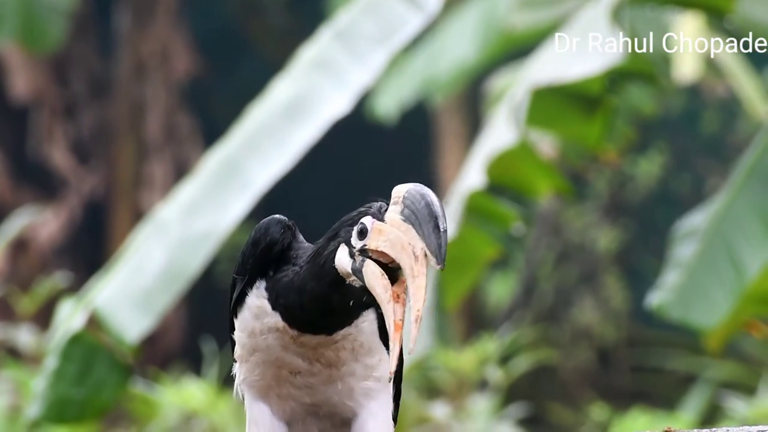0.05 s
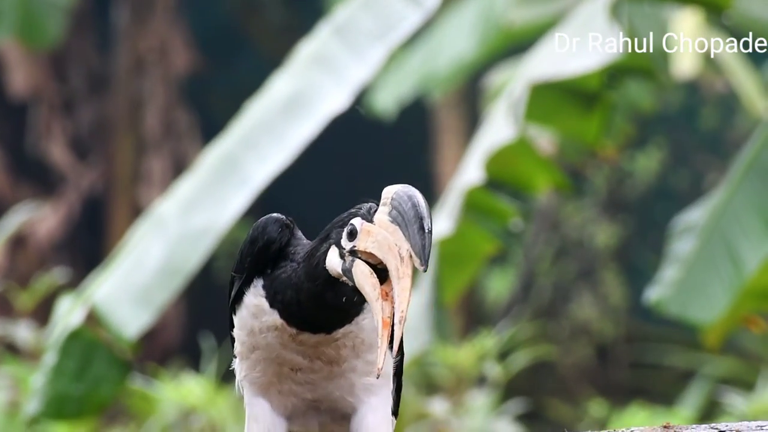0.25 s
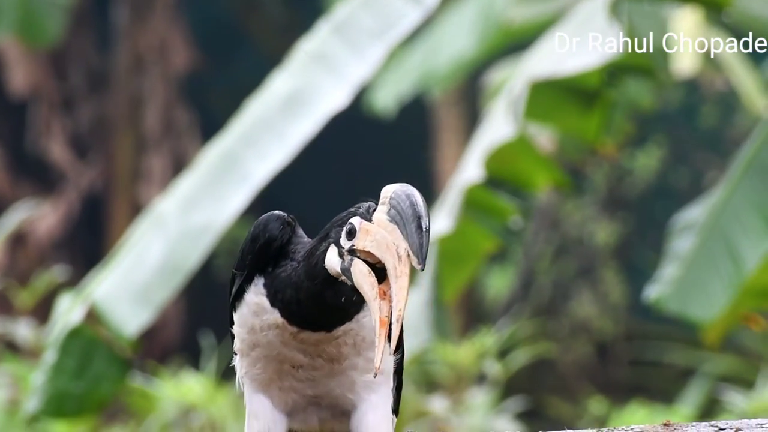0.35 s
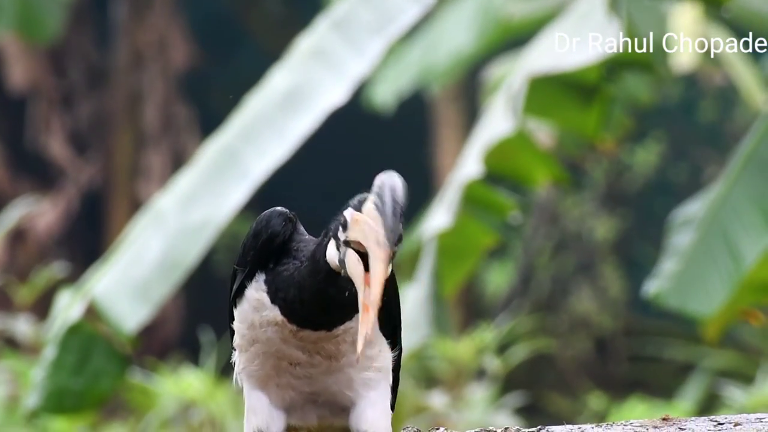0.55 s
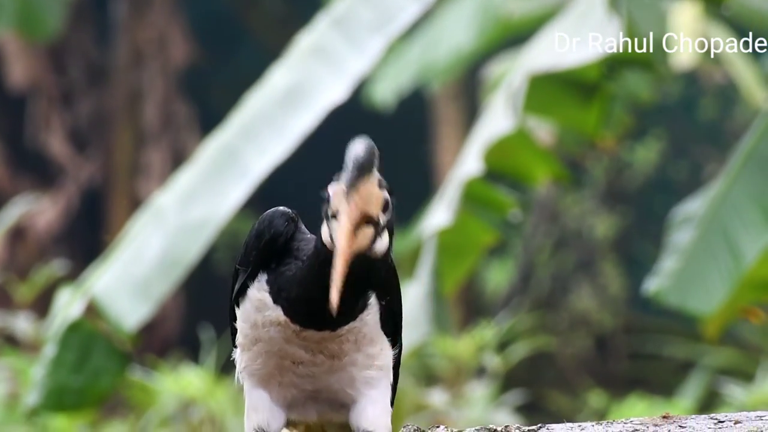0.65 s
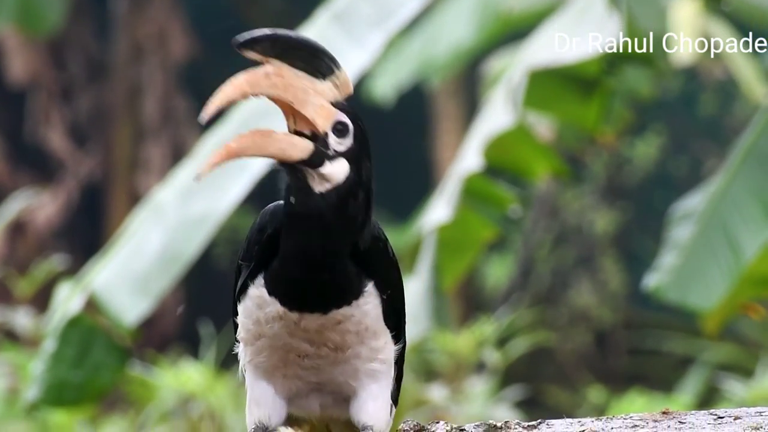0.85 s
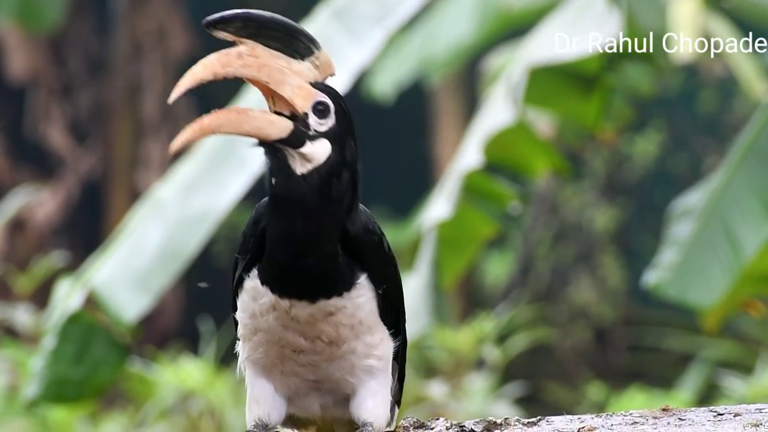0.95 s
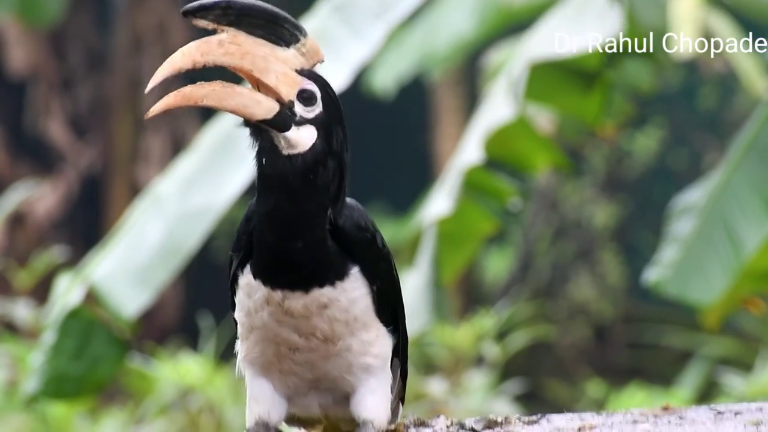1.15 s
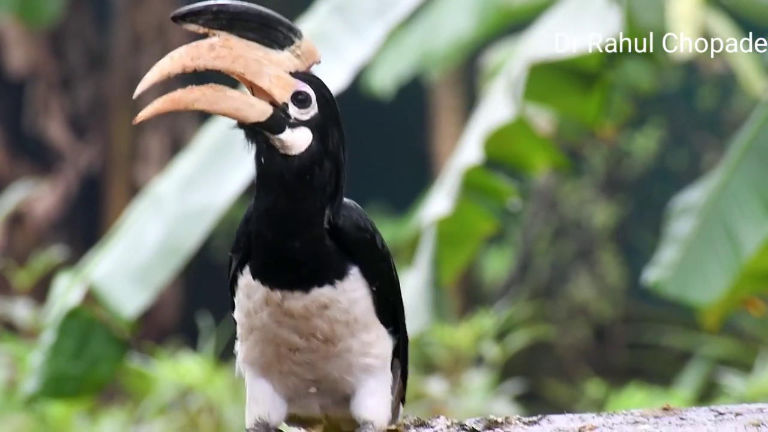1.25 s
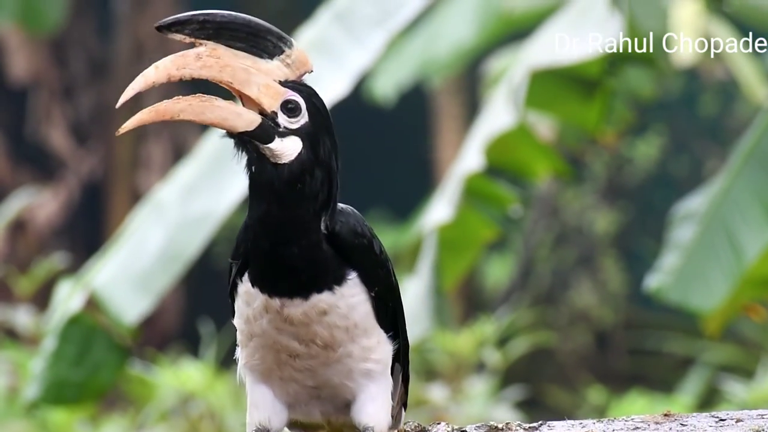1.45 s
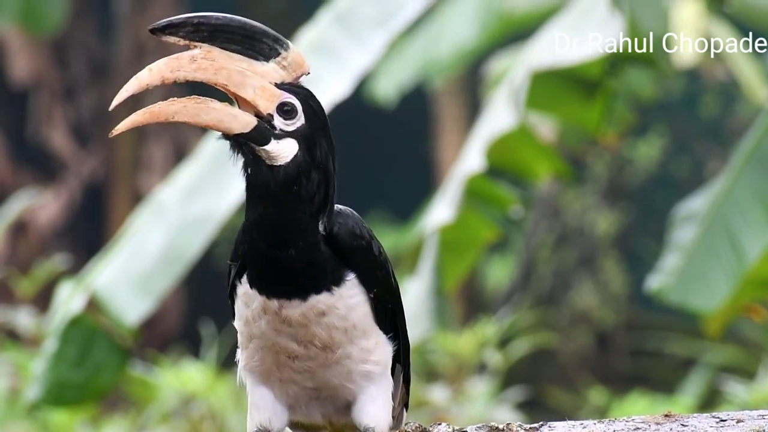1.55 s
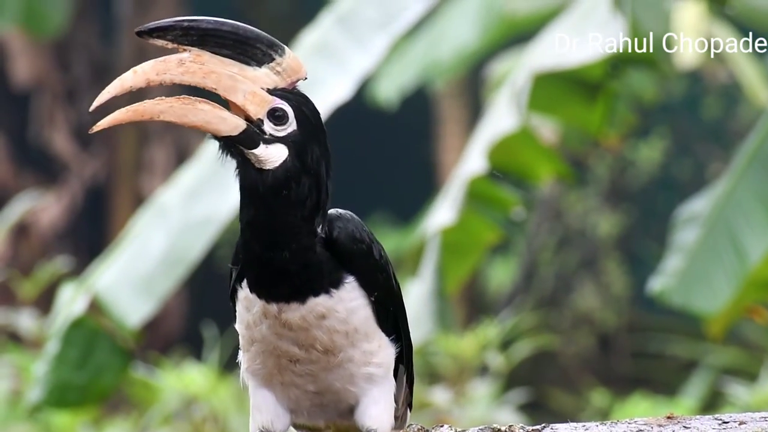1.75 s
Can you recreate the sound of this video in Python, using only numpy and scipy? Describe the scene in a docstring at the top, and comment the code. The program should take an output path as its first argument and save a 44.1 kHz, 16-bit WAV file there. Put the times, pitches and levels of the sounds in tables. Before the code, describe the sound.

A hornbill gives three loud, harsh nasal honks close by, each starting and ending in a rasp. Thin whines fill the pauses, and a weaker call begins last. Trees echo faintly over a low outdoor rumble.

```python
"""A hornbill in a garden

A hornbill honks harshly from a perch close by, its voice box sending pulses of air through throat and
bill. The first two loud calls break from a rasp and a high squawk into a nasal honk, the third from a
rasp and a soft croak; each falls apart in a rasp again. Thin whines fill the pauses. Leaves scatter
the sound, and the trees give back a long faint echo over a low outdoor rumble."""
import sys
import numpy as np
from scipy import signal
from scipy.fft import rfft, irfft, next_fast_len
from scipy.io import wavfile
from scipy.ndimage import uniform_filter1d, minimum_filter1d

SR = 44100
rng = np.random.default_rng(int(sys.argv[2]) if len(sys.argv) > 2 else 0)


def log_audio(samples):
    """Write samples as a 16-bit WAV file to the path given in sys.argv[1]."""
    # one column per channel
    frames = np.atleast_2d(samples).T
    # limit to full scale, then quantise
    limited = np.clip(frames, -1, 1)
    pcm = np.round(limited * 32767).astype(np.int16)
    wavfile.write(sys.argv[1], SR, pcm)


N = 79380  # 1.8 seconds
TOP_HZ = 15400  # upper edge of the sound


def amp(db):
    """Turns decibels into a number to multiply by."""
    return 10 ** (np.asarray(db) / 20)


def unit(x):
    """Scales a sound to an average power of 1."""
    return x / np.sqrt(np.mean(x ** 2) + 1e-20)


def steady(x, size=220):
    """Holds the level at 1, averaging over `size` samples."""
    return x / np.sqrt(abs(uniform_filter1d(x ** 2, size)) + 1e-12)


def look_up(points, hz):
    """Reads between the rows of a (frequency, value) table, with octaves evenly spaced."""
    row_hz, value = np.transpose(points)
    return np.interp(np.log(hz + 1), np.log(row_hz + 1), value)


def hiss(n):
    """White noise for one note."""
    return rng.standard_normal(SR // 2)[:n]


def wander(n, hz):
    """A smooth random wobble of size about 1, mostly slower than `hz`."""
    size = SR // 2
    rolloff = np.sqrt(1 + (np.fft.rfftfreq(size, 1 / SR) / hz) ** 4)
    return unit(irfft(rfft(hiss(size)) / rolloff, size))[:n]


def resonate(x, throat, size=2048):
    """Filters a sound as throat and bill do: they ring after each pulse, never before it."""
    log_gain = np.log(amp(look_up(throat, abs(np.fft.fftfreq(size, 1 / SR)))))
    ring = np.fft.ifft(np.exp(np.conj(signal.hilbert(log_gain)))).real
    return signal.fftconvolve(x, ring[:size // 2])[:len(x)]


def note_curves(table):
    """A note's start time, its 2 ms fade in and out, and a curve for each column after time."""
    times, *columns = np.transpose(table)
    times = np.sort(times)
    t = np.arange(times[0], times[-1], 1 / SR)
    fade = np.clip(np.minimum(t - times[0], times[-1] - t) / .002, 0, 1)
    return times[0], fade, [np.interp(t, times, column) for column in columns]


def pulses(cycles, hz, tilt_db, lows_db=(0, 0), count=14):
    """One pulse per cycle, built from harmonics: tones at whole multiples of the pitch."""
    k = np.arange(1, count + 1)[:, None]
    db = tilt_db * np.log2(k) + np.pad(lows_db, (0, count - 2))[:, None]
    return np.sum(amp(db) * (k * hz < TOP_HZ) * np.cos(2 * np.pi * k * cycles), axis=0)


# Tone of the outdoor background (frequency [Hz], relative level [dB])
AIR_TONE = [(20, -5), (31, 3), (45, 2.5), (70, -2.5), (130, 2), (200, -5), (300, -13), (500, -20.5),
            (900, -22), (2000, -18), (5000, -16.5), (9000, -21), (10500, -33), (15000, -46)]
# How alike it is in the two ears (frequency [Hz], likeness [0-1])
AIR_LIKENESS = [(120, .999), (250, 1), (600, 1), (2000, 0.21), (8000, 0.1)]


def outdoor_air(level_db=-40.5):
    """A distant low rumble, alike in both ears, and a faint wide hiss."""
    hz = np.fft.rfftfreq(N, 1 / SR)
    left, other = rfft(rng.standard_normal((2, N)))
    likeness = look_up(AIR_LIKENESS, hz)
    right = likeness * left + np.sqrt(1 - likeness ** 2) * other
    return amp(level_db) * unit(irfft(np.array([left, right]) * amp(look_up(AIR_TONE, hz)), N))


# How long the trees echo (frequency [Hz], time to fade by 60 dB [s]); a negative time grows instead
TREE_FADE = [(500, 1), (1500, 0.26), (4000, 0.4), (6500, 0.4), (10000, 1.2), (15000, -1.5)]
# How strong their echo is next to the direct call (frequency [Hz], level [dB])
TREE_LEVEL = [(500, -35), (1250, -15), (1800, -16.5), (2500, -15.5), (3100, -24), (3800, -17),
              (5100, -17.5), (6400, -16.5), (10000, -24.5), (15000, -26)]


def tree_echo(swell_s=.13, row_delay_s=.26, row_spread_s=.038, row_db=6):
    """The trees' answer to a click: it swells slowly, and a row of trees adds a smeared bump."""
    hz, t, noise = signal.stft(rng.standard_normal(N), SR, nperseg=256)
    shape = amp(-60 * t / look_up(TREE_FADE, hz)[:, None])
    shape *= 1 - np.exp(-t / swell_s)
    shape *= amp(row_db * np.exp(-.5 * ((t - row_delay_s) / row_spread_s) ** 2))
    band_energy = N * np.mean(shape ** 2, axis=1, keepdims=True)
    shape *= amp(look_up(TREE_LEVEL, hz))[:, None] / np.sqrt(band_energy)
    return signal.istft(noise * shape, SR, nperseg=256)[1][:N]


def leaf_scatter(level_db=-9.5, fade_s=.051):
    """Nearby leaves scatter a click into a quickly dying puff of noise."""
    t = np.arange(N) / SR
    return amp(level_db) * unit(rng.standard_normal(N) * amp(-60 * t / fade_s)) / np.sqrt(N)


# Bounces off nearby surfaces into each microphone (delay [ms], gain [factor])
LEFT_BOUNCES = [(1.3, 0.022), (3.1, 0.061), (7.4, -0.18), (13.2, 0.093)]
RIGHT_BOUNCES = [(.9, -0.01), (2.3, 0.17), (5.9, 0.18), (11.1, -0.14)]
# The bill points across the microphones (frequency [Hz], left minus right level [dB])
SIDE_BALANCE = [(60, 2), (87, 4), (120, 3), (180, 0.0), (260, -7), (380, 1), (540, 0.0), (780, 2.5),
                (1130, -1.5), (1630, -1), (2350, -2.0), (3390, 0.5), (4890, 0.0), (7060, -0.5),
                (10200, -7.5), (14700, 5)]
# How far the left wave runs ahead of the right (frequency [Hz], phase [radians])
LEFT_LEAD = [(0, 0.32), (1030, -0.046), (1640, 0.83), (1980, -0.022), (2580, 0.22), (3700, -0.32),
             (3960, -0.69), (4820, -0.5), (6460, -0.56), (6800, -1.7), (7920, 0.06), (8350, -1.5),
             (9390, -1.35), (10200, -1.5), (12800, 0.14), (14900, -0.0)]


def garden(voice, bounces, side):
    """The call and all its echoes at one microphone; side is 1 for left, -1 for right."""
    paths = tree_echo() + leaf_scatter()
    paths[0] += 1  # the direct call
    for delay_ms, gain in bounces:
        paths[round(delay_ms * SR / 1000)] += gain
    size = next_fast_len(len(voice) + N)
    hz = np.fft.rfftfreq(size, 1 / SR)
    balance = amp(side * look_up(SIDE_BALANCE, hz) / 2)
    phase_shift = np.exp(.5j * side * look_up(LEFT_LEAD, hz))
    heard = irfft(rfft(voice, size) * rfft(paths, size) * balance * phase_shift, size)
    return heard[len(voice) - N:len(voice)]  # keep the part from time zero on


# One list of points per whine (time [s], pitch [Hz], level [dB])
WHINE_NOTES = [
    [(0, 744, -43), (.05, 781.4, -32), (.12, 756, -37.5), (.17, 750, -45), (.205, 681, -40)],
    [(.52, 700, -57), (.57, 770, -31.5), (.61, 804, -29.5), (.665, 792, -26.5), (.688, 750, -76)],
    [(.945, 742, -43), (.975, 812, -32.5), (1.005, 834.6, -32.5), (1.1, 808.5, -29.5), (1.21, 794.3, -32),
     (1.24, 772, -35), (1.262, 735, -51)],
    [(1.485, 730, -56), (1.53, 742, -39), (1.565, 730, -47.5), (1.605, 688, -57)],
]
# One value per whine (gain of all harmonics but the second [dB])
WHINE_HARMONICS = [-3.5, -1.5, 0, -5]
# How throat and bill shape a whine (frequency [Hz], relative gain [dB])
WHINE_TONE = [(400, -32), (800, -21), (1550, -0.5), (2400, -16), (3250, -11.5), (4000, -12), (4800, -18),
              (5700, -18), (7200, -30), (10000, -42), (15000, -40)]


def whines(pitch_wobble=.004, breath=.29):
    """Thin, nearly pure notes: the throat favours their second harmonic."""
    for table, others_db in zip(WHINE_NOTES, WHINE_HARMONICS):
        start, fade, (hz, db) = note_curves(table)
        n = len(hz)
        cycles = np.cumsum(hz * (1 + pitch_wobble * wander(n, hz=120))) / SR
        second = np.cos(2 * np.pi * 2 * cycles)
        others = pulses(cycles, hz, 0) - second
        source = second + amp(others_db) * others + breath * hiss(n)
        yield start, fade * amp(db) * steady(resonate(source, WHINE_TONE))


# One row per rasp (peak time [s], level [dB], time to rise 20 dB [s], time to fall 20 dB [s],
# typical flap rate [Hz], gain of the low knock [dB])
RASP_BURSTS = [(0.191, -33.5, .04, 0.022, 900, -5), (.238, -13, .024, 0.028, 780, 1),
               (.425, -19, 0.019, 0.053, 720, -24), (.535, -27, 0.048, 0.045, 930, -20),
               (.64, -26.5, 0.068, .1, 910, -8), (.706, -11.5, 0.022, 0.028, 840, 2.5),
               (.884, -19, 0.018, 0.041, 680, -22), (1.283, -28.5, .01, 0.08, 427, 3.5),
               (1.303, -17.5, 0.014, 0.011, 450, -15), (1.407, -21.5, 0.013, 0.034, 576, -12),
               (1.772, -33, 0.012, 0.069, 800, -32)]
# How throat and bill shape a rasp (frequency [Hz], relative gain [dB])
RASP_TONE = [(200, -18), (500, -18.5), (800, -26.5), (1050, -22), (1300, -2.5), (1700, 4.5), (2200, -2.5),
             (2900, -2.5), (3600, 0), (4600, -2), (6200, -11), (8800, -15), (10500, -32.5), (15000, -35.5)]


def rasps(breath=.47, knock_below_hz=886):
    """The voice box flaps unevenly as a call starts or breaks up."""
    t = np.arange(-SR // 10, SR // 5) / SR  # zero at the peak
    n = len(t)
    highpass = signal.butter(4, knock_below_hz, "high", fs=SR, output="sos")
    lowpass = signal.butter(4, knock_below_hz, fs=SR, output="sos")
    for peak_s, db, rise_s, fall_s, flap_hz, knock_db in RASP_BURSTS:
        cycles = np.cumsum(flap_hz * np.exp(.4 * wander(n, hz=397.6))) / SR
        flaps = np.diff(np.floor(cycles), prepend=0)  # one click per cycle
        flaps *= amp(3.2 * wander(n, hz=504))
        puffs = np.exp(-2 * (cycles % 1)) * hiss(n)
        source = unit(flaps) + breath * unit(puffs)
        source = signal.sosfilt(highpass, source) + amp(knock_db) * signal.sosfilt(lowpass, source)
        loudness = amp(db - 20 * np.maximum(-t / rise_s, t / fall_s))
        yield peak_s + t[0], loudness * steady(resonate(source, RASP_TONE), size=500)


def voiced_note(table, throat, lows_db=(0, 0)):
    """Voice box pulses slip in time and strength when rough; pairing up adds a tone an octave down."""
    pitch_wobble, level_wobble, breath = .022, .48, .11  # at full roughness
    rough_slip_cycles, pair_slip_cycles = .047, .071
    start, fade, (hz, db, rough, pairing, brightness) = note_curves(table)
    n = len(hz)
    cycles = np.cumsum(hz * (1 + pitch_wobble * rough * wander(n, hz=231))) / SR
    cycles += pair_slip_cycles * pairing * np.cos(np.pi * cycles)  # one pulse early, the next late
    cycles += rough_slip_cycles * rough * wander(n, hz=640)
    buzz = steady(pulses(cycles, hz, brightness, lows_db))
    buzz *= 1 + level_wobble * rough * wander(n, hz=475)
    puffs = (1 + np.cos(2 * np.pi * cycles)) * hiss(n)
    return start, fade * amp(db) * steady(resonate(buzz + breath * rough * puffs, throat))


# One list of points per croak
# (time [s], pitch [Hz], level [dB], roughness [0-1], pulse pairing [0-1], brightness [dB per octave])
CROAK_NOTES = [
    [(1.277, 869, -39, .3, .1, -5), (1.292, 898, -35.5, 0.34, .1, -2), (1.304, 933, -28, 0.33, .1, -6)],
    [(1.408, 997, -32, .3, .1, 3), (1.428, 890, -37, 0.19, .1, -2), (1.455, 857, -44, .2, .1, -3)],
]
# How throat and bill shape a croak (frequency [Hz], relative gain [dB])
CROAK_TONE = [(400, -25), (900, -7.5), (1700, -4), (2600, 6), (3600, 6), (5500, 0), (9000, -22),
              (15000, -54)]


def croaks():
    """Slower, softer pulses just before and after the honk at 1.3 s."""
    return [voiced_note(table, CROAK_TONE) for table in CROAK_NOTES]


# One list of points per squawk
# (time [s], pitch [Hz], level [dB], roughness [0-1], pulse pairing [0-1], brightness [dB per octave])
SQUAWK_NOTES = [
    [(.221, 1578, -22.5, 0.77, 0.18, 0), (.232, 1718, -12.5, 0.91, .2, -3.5),
     (.238, 1748, -11.5, 0.68, 0.22, -1.5), (.243, 1700, -24, 0.53, .2, -8)],
    [(.25, 1756, -22, 0.51, .1, 0), (.255, 1763, -11.5, 0.32, .1, -0.75),
     (.268, 1878, -10, 0.13, 0.093, 0.5), (.276, 1954, -13, 0.15, .1, -0.69),
     (.286, 1970, -23, 0.41, .2, -2)],
    [(.695, 1523, -16.5, 1, 0.16, -0.5), (.704, 1673, -12, 0.94, 0.22, 4.5),
     (.714, 1827, -10, 0.58, 0.6, 1), (.721, 1950, -7.5, 0.8, 0.23, 9)],
    [(1.787, 1800, -35, .4, 0.11, -7), (1.793, 1770, -25, 0.35, .1, -16), (1.8, 1810, -21, 0.34, .1, 0)],
]
# How throat and bill shape a squawk (frequency [Hz], relative gain [dB])
SQUAWK_TONE = [(300, -47), (900, -40), (1400, -7), (1850, 0.5), (2500, -11), (3700, -3.5), (5500, -6.5),
               (7500, -15.5), (9200, -19), (11000, -25.5), (15000, -88)]


def squawks():
    """The voice box pulses in its fast, high range for a moment."""
    return [voiced_note(table, SQUAWK_TONE) for table in SQUAWK_NOTES]


# One list of points per honk
# (time [s], pitch [Hz], level [dB], roughness [0-1], pulse pairing [0-1], brightness [dB per octave])
HONK_NOTES = [
    [(.234, 1191, -23, 0.3, 0, 2), (.243, 1261, -6.5, 0.47, 0.42, 0), (.25, 1300, -13.5, .3, .1, -2),
     (.254, 1300, -28, .6, .1, -7)],
    [(.276, 1076, -14, 0.65, .3, 1), (.283, 1077, -11.5, 0.3, 0, 4.5), (.308, 1098, -14.5, 0.16, .7, 1.5),
     (.328, 1123, -12, 0.11, 0, 4.5), (.368, 1131, -12, 0.1, 0.06, 1), (.376, 1145, -16, .08, .03, 4),
     (.389, 1202, -12, 0, 0, 0.5), (.401, 1135, -13, 0.2, 0, 2), (.416, 1055, -21, 0.38, 0.5, 1.5),
     (.436, 926, -23, 0.84, 0.5, 0)],
    [(.512, 952, -36, 0.65, 0.3, -4), (.54, 1207, -24.5, 0.3, 0.57, -6.5), (.565, 1321, -21, 0.25, .05, -7),
     (.591, 1337, -13.5, 0, .05, -6), (.598, 1471, -19.5, 0.6, 0.4, -10.5),
     (.614, 1480, -18, 0.54, 0.1, -13.5), (.632, 1252, -20, 0.63, 0.6, -6.5), (.65, 1080, -32, .6, 0.5, -3)],
    [(.719, 1125, -18, 0.66, .2, 0), (.725, 1146, -8.5, 0.23, 0.15, 5), (.738, 1201, -11, 0.24, 0.17, 2),
     (.748, 1260, -13, 0.15, 0, -1.5), (.78, 1273, -8, 0, 0, 4), (.82, 1333, -7.5, 0.03, 0.07, -1.5),
     (.827, 1373, -16.5, 0.88, 0.06, 3), (.835, 1309, -9, 0.2, 0.15, -0.5), (.852, 1317, -6, 0, 0.01, 0.5),
     (.872, 1218, -17.5, 0.1, 0.35, -2), (.884, 1120, -18, .6, 0.5, 1)],
    [(1.301, 1067, -16.5, 0.3, 0.95, -6), (1.309, 1104, -13, 0.3, 0.4, -4.5),
     (1.323, 1121, -11, 0.04, 0.2, -5.5), (1.336, 1171, -16, 0.1, 0.33, -6), (1.344, 1237, -11, 0.1, 0, -5),
     (1.362, 1258, -11.5, 0, 0, -4.5), (1.384, 1227, -15, 0.06, 0, -6), (1.397, 1103, -19.5, 0.3, 0.24, -3),
     (1.412, 1064, -28, 0.4, 0, -3)],
    [(1.76, 1072, -52, 0.65, 0, -19), (1.777, 1228, -24.5, 0.35, 0, -3.5),
     (1.787, 1331, -24.5, 0.5, .1, -2.5), (1.8, 1420, -28.5, 0.56, 0.3, 0)],
]
# A honk that ends just before time zero, so only its echo is heard; same columns
ECHO_ONLY_HONK = [(-.3, 1150, -16, .15, .1, 0), (-.24, 1240, -29, 0.088, .03, 0),
                  (-.17, 1272, -11, 0.028, .02, 0), (-.11, 1255, -6.5, .06, .02, 0),
                  (-.07, 1150, -11.5, .2, .1, -2)]
# One row per honk (gain of the first harmonic [dB], gain of the second harmonic [dB])
HONK_LOW_HARMONICS = [(-4, 2), (0, -2), (-20.5, -15.5), (0, -5), (-13.5, 1.5), (-12.5, 4.5)]
# How throat and bill shape a honk (frequency [Hz], relative gain [dB])
HONK_TONE = [(300, -32), (800, -37), (1100, -11.5), (1320, -7.5), (1700, -11), (2200, -14.5), (2600, -9.5),
             (3350, 0.5), (4000, -2), (4500, 0.5), (5150, 0), (5800, -4), (6600, -6), (7800, -11.5),
             (9000, -10.5), (10000, -27), (11800, -29.5), (13200, -35), (15000, -51)]


def honks():
    """Throat and bill bring out the upper harmonics of the buzz, making it harsh and nasal."""
    notes = [voiced_note(table, HONK_TONE, lows) for table, lows in zip(HONK_NOTES, HONK_LOW_HARMONICS)]
    return notes + [voiced_note(ECHO_ONLY_HONK, HONK_TONE, lows_db=(-4, -6))]


def hornbill(lead_s=.4):
    """All the bird's notes on one track, which begins `lead_s` before time zero."""
    voice = np.zeros(N + round(lead_s * SR))
    for start, sound in [*rasps(), *whines(), *squawks(), *croaks(), *honks()]:
        slot = voice[round((start + lead_s) * SR):][:len(sound)]
        slot += sound[:len(slot)]
    return voice


def scene():
    """The bird in its garden, in stereo, over the outdoor rumble."""
    voice = hornbill()
    left = garden(voice, LEFT_BOUNCES, side=1)
    right = garden(voice, RIGHT_BOUNCES, side=-1)
    return np.array([left, right]) + outdoor_air()


def record(dry):
    """Briefly turns down peaks that are too loud, then cuts the highest treble."""
    ceiling, window_samples = .98, 90
    safe_gain = np.minimum(ceiling / (abs(dry).max(0) + 1e-9), 1)
    smooth_gain = uniform_filter1d(minimum_filter1d(safe_gain, window_samples), window_samples)
    lowpass = signal.firwin(511, TOP_HZ, window=("kaiser", 9), fs=SR)
    return signal.oaconvolve(dry * smooth_gain, lowpass[None], "same")


dry = scene()
out = record(dry)
log_audio(out)
```